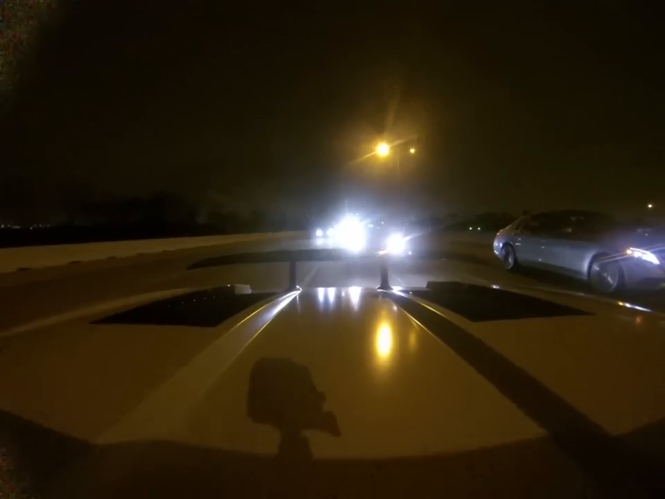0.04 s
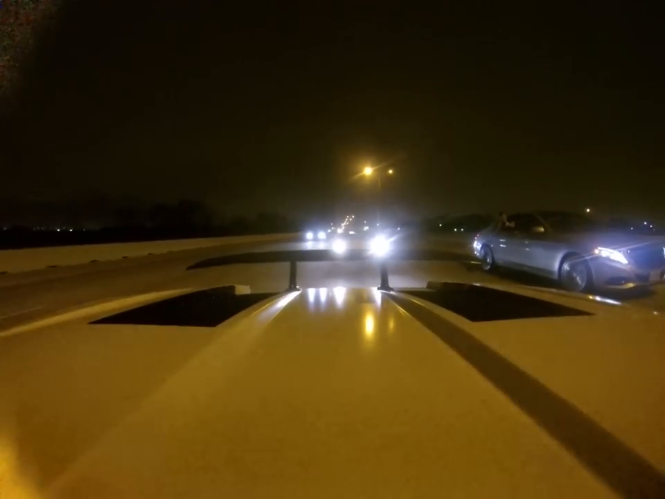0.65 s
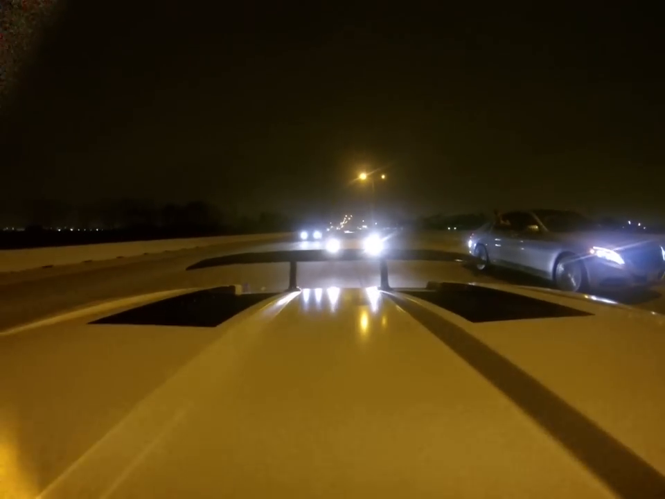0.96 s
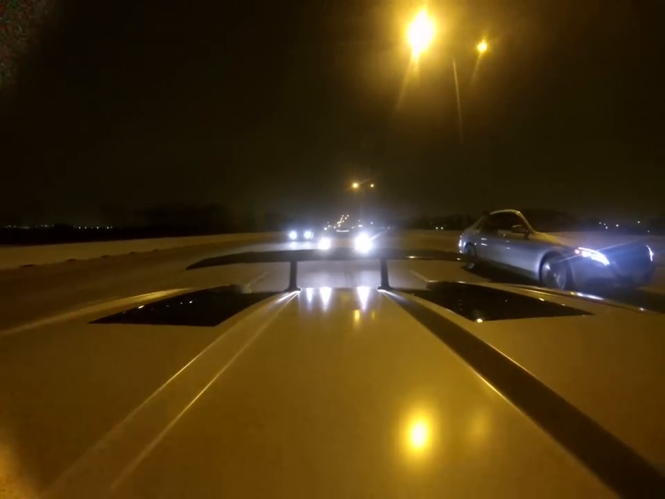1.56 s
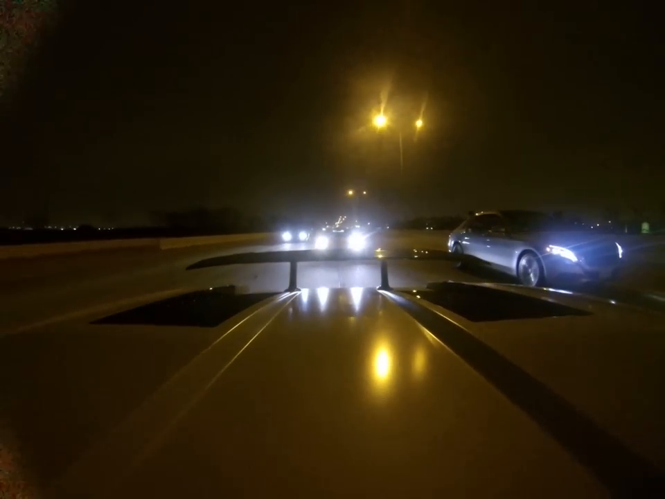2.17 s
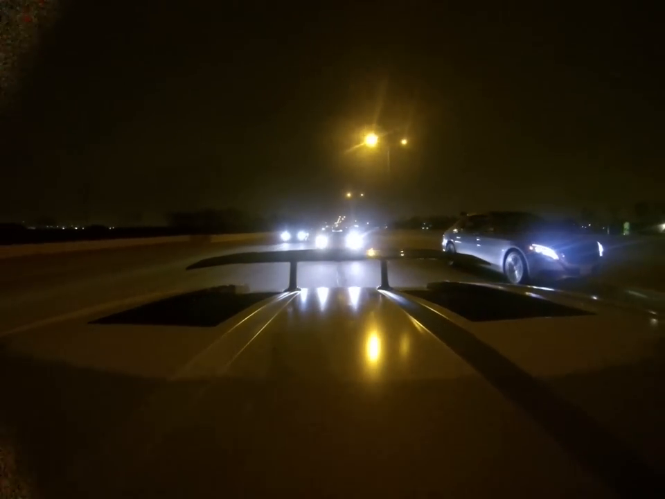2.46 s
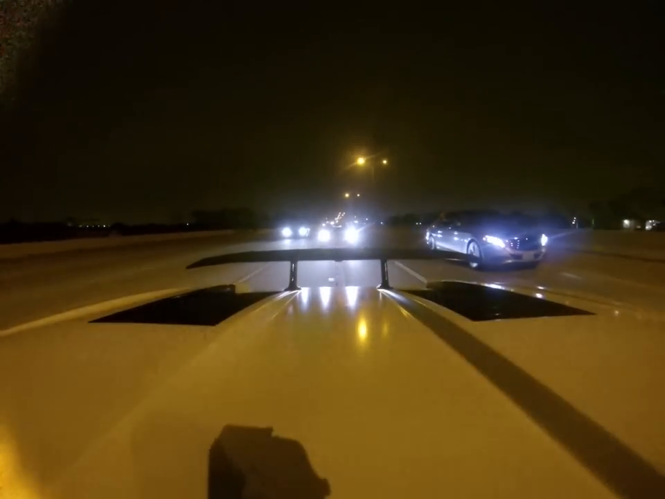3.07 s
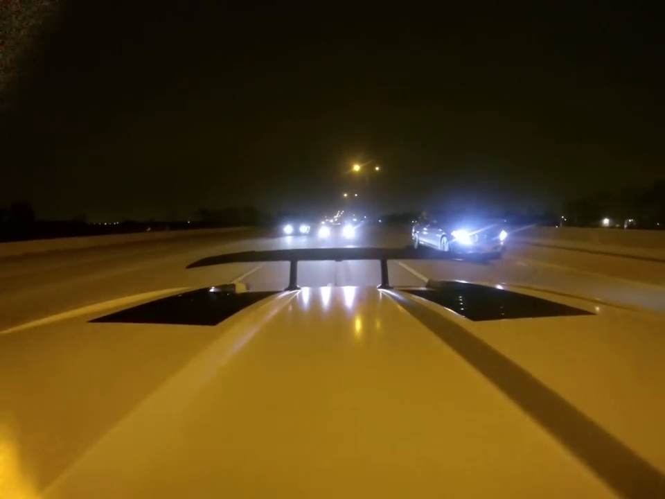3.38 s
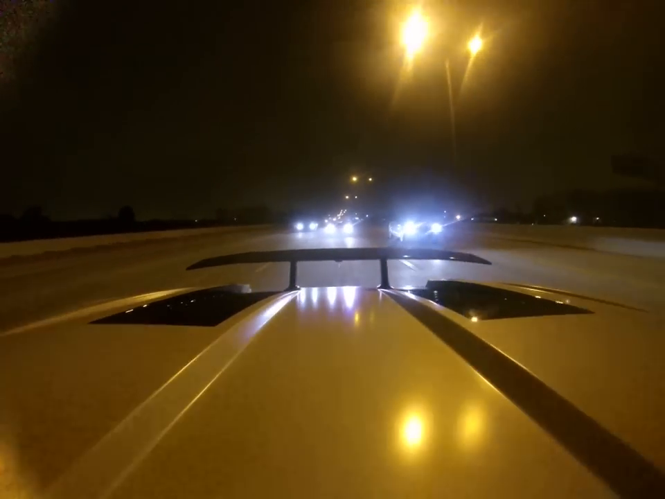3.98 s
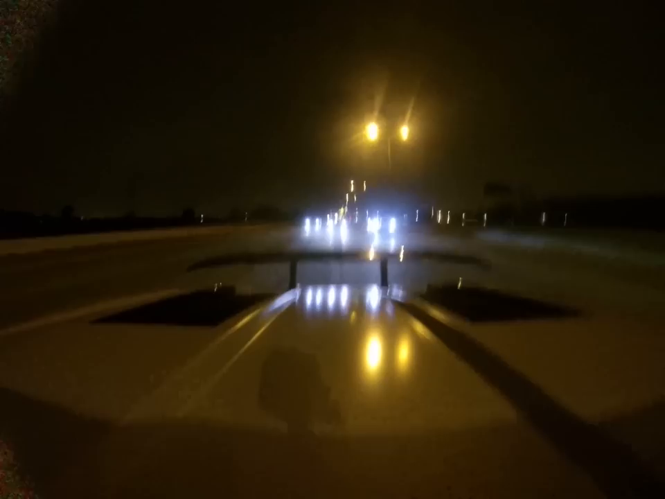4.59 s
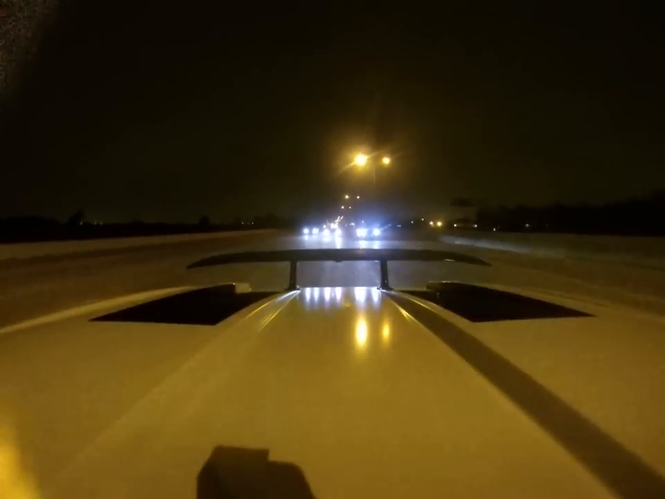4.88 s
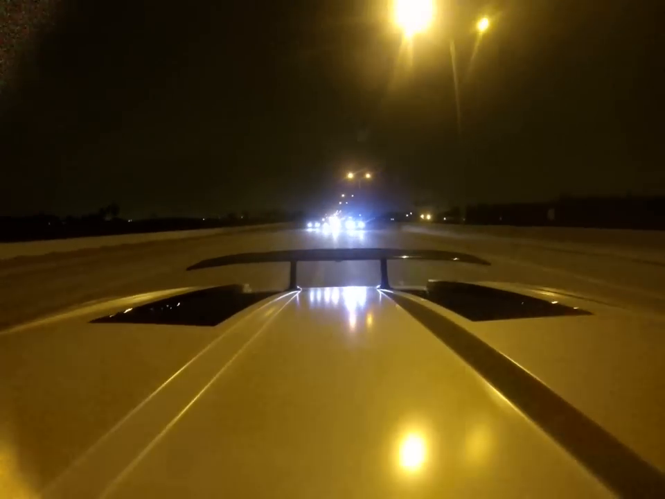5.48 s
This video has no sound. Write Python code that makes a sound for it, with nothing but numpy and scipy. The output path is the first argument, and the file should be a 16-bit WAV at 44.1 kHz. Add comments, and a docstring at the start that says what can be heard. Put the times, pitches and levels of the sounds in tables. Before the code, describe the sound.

A sports car accelerates hard, its exhaust drone and faint turbo whistle rising under heavy wind buffeting, with one upshift.

```python
"""Highway, rear deck of a turbocharged ten-cylinder sports car: cruise, full throttle, one upshift.
The exhaust drones at the firing rate through the pipe's resonances. The turbo whistles at its rising
blade rate; the intake hisses and rasps with boost. Heavy wind buffets and slaps the microphone and,
as it grows, drives it into saturation, so the roar turns harsh and chops the treble."""
import sys
import numpy as np
from scipy.fft import rfft, irfft, next_fast_len
from scipy.io import wavfile
from scipy.ndimage import uniform_filter1d, map_coordinates

SR = 44100
rng = np.random.default_rng(int(sys.argv[2]) if len(sys.argv) > 2 else 0)


def wav_out(sig):
    """Save sig, one row per channel (or a flat mono array), as 16-bit PCM at SR to the path in sys.argv[1]."""
    wavfile.write(sys.argv[1], SR, np.round(np.clip(np.atleast_2d(sig).T, -1, 1) * 32767).astype(np.int16))


N = 244314

# crank speed through cruise, full throttle, upshift, next gear: t/s, f/Hz
CRANK_SPEED = [(0, 81.1), (.2, 80.9), (.6, 79.2), (1.2, 80.9), (1.5, 82.3), (2, 83.8), (2.5, 86.4),
               (2.85, 91.8), (3.1, 97.6), (3.3, 102.8), (3.7, 114.2), (4.47, 130), (4.7, 99), (4.9, 101),
               (5.1, 104.3), (5.54, 109.8)]
# turbo blade rate; spools up, levels off, sags in the shift, recovers: t/s, f/Hz
BLADE_RATE = [(0, 3300), (1.4, 4000), (1.67, 4880), (1.83, 5450), (2.13, 6400), (2.5, 7560), (2.9, 9170),
              (3.1, 10230), (3.3, 11170), (3.55, 11780), (4, 12550), (4.48, 12600), (4.58, 10950),
              (4.72, 10100), (5.1, 11350), (5.54, 12200)]
# finest turbulence: f/Hz, level/dB
FIZZ_SPECTRUM = [(2000, -46), (3500, -13.5), (5200, -1), (7200, -2.5), (8100, -0.5), (8750, 3.5),
                 (9500, -2), (11000, -0.5), (12300, -11), (15000, -13)]


def amp(db):
    """Decibels to gain."""
    return 10 ** (np.asarray(db) / 20)


def unit(x):
    """x scaled to rms 1."""
    return x / np.sqrt(np.mean(x ** 2) + 1e-20)


def lookup(rows, at):
    """Later columns interpolated at values of the first."""
    key, *cols = np.transpose(rows)
    return [np.interp(at, key, c) for c in cols]


def curve(rows):
    """(t/s, value) rows, interpolated per sample."""
    return lookup(rows, np.arange(N) / SR)[0]


def swells(rows):
    """Sum of bell curves: t/s, half length/s, height."""
    t = np.arange(N) / SR
    return sum(height * np.exp(-((t - at_s) / half_s) ** 2) for at_s, half_s, height in rows)


def wobble(rate_hz):
    """Smooth random curve, rate_hz knots a second."""
    knots = rng.standard_normal(int(N * rate_hz / SR) + 4)
    return map_coordinates(knots, [np.arange(N) * rate_hz / SR])


def filtered(x, response):
    """x through a complex frequency response."""
    size = next_fast_len(N + SR // 2)
    return irfft(rfft(x, size) * response(np.fft.rfftfreq(size, 1 / SR)), size)[:N]


def lowpass(x, edge_hz, order=4):
    """Zero-phase low-pass, half gain at edge_hz."""
    return filtered(x, lambda hz: 1 / (1 + (hz / edge_hz) ** order))


def noise(spectrum, pace=1):
    """Noise of rms 1 from (f/Hz, level/dB) rows; pace scales the frequencies."""
    f_hz, db = np.transpose(spectrum)
    x = filtered(rng.standard_normal(N), lambda hz: amp(np.interp(np.log(hz + 1), np.log(f_hz), db)))
    return unit(map_coordinates(x, [np.cumsum(pace * np.ones(N))], mode="mirror"))


def phase(hz):
    """Running angle in rad."""
    return 2 * np.pi * np.cumsum(hz) / SR


def band(centre_hz, width_hz):
    """Narrow noise of rms 1 around a moving centre."""
    a, b = (lowpass(row, width_hz, order=2) for row in rng.standard_normal((2, N)))
    angle = phase(centre_hz)
    return unit(a * np.cos(angle) + b * np.sin(angle))


def boost(full_hz):
    """0 at the starting blade rate, 1 from full_hz up."""
    blade_hz = curve(BLADE_RATE)
    return np.clip((blade_hz - blade_hz[0]) / (full_hz - blade_hz[0]), 0, 1)


def upshift_db(next_gear_db, lag_s=0, at_s=4.675, half_s=.08, dip_db=-20.5):
    """Throttle lift: a dip, later and longer by lag_s, then the next gear's level."""
    shifted = np.clip((np.arange(N) / SR - at_s) / half_s + 1, 0, 1)
    return swells([(at_s + lag_s, half_s + lag_s, dip_db)]) + next_gear_db * shifted


def road_speed():
    """Speed relative to cruise: grows with the revs, holds when they drop."""
    log_rise = np.gradient(np.log(curve(CRANK_SPEED)))
    return np.exp(np.cumsum(np.maximum(log_rise, 0)))


def exhaust(rough_hz=130, rough_rad=.09, muffled_db=-19.5, boom_hz=351, boom_width_hz=22):
    """The engine fires five times a turn, unevenly; the crank's orders sweep the pipe's resonances."""
    # pipe response at the firing rate: f/Hz, level/dB
    pipe_response = [(395, -18.7), (405, -19.3), (413, -15), (419, -19), (425, -16), (440, -18), (457, -18),
                     (485, -14.5), (518, -11), (546, -14), (558, -21), (572, -21.5), (585, -27), (605, -38)]
    # level of the firing note's octave in the upper resonances: f/Hz, level/dB
    upper_response = [(790, -47), (805, -42), (820, -36), (830, -34), (842, -39), (870, -37.5), (910, -34),
                      (960, -31), (1005, -25.5), (1050, -26), (1095, -26.5), (1120, -38), (1170, -50)]
    # crank multiple, cruise level/dB, full-load level/dB, flutter/dB
    orders = [(5, -0.7, -1, 1.5), (6.5, -19.5, -34, 5), (10.5, -36, -23.5, 3), (15, -39, -25.5, 5)]
    crank_hz = curve(CRANK_SPEED)
    crank_rad = phase(crank_hz * (1 + .0015 * wobble(30)))
    pipe_db, = lookup(pipe_response, 5 * crank_hz)
    load = boost(full_hz=11800)
    note = np.zeros(N)
    for multiple, cruise_db, full_db, flutter_db in orders:
        wave = np.sin(multiple * crank_rad + rng.uniform(0, 2 * np.pi) + rough_rad * wobble(rough_hz))
        # higher orders fade faster than the firing note
        muffle_db = 2 * np.minimum(pipe_db - muffled_db, 0) * (multiple > 5)
        order_db = cruise_db + load * (full_db - cruise_db) + muffle_db
        note += amp(order_db + flutter_db * wobble(40)) * wave
    in_tune = 1 / (1 + ((4 * crank_hz - boom_hz) / boom_width_hz) ** 6)
    boom_db = -42 + 17.5 * in_tune + 2 * wobble(25)
    boom = amp(boom_db) * np.sin(4 * crank_rad)
    octave_db, = lookup(upper_response, 10 * crank_hz)
    octave = amp(octave_db + 2 * wobble(40)) * np.sin(10 * crank_rad + rough_rad * wobble(rough_hz))
    octave *= amp(upshift_db(-1.5, lag_s=.034))
    drone = amp(pipe_db + wobble(rough_hz)) * note + boom
    drone *= amp(upshift_db(-3.5))
    return np.sqrt(2) * (drone + octave)


def turbo(waver=.0025, flicker_db=3, respool_db=-4, slowing_db=-12):
    """The compressor whistles at its blade rate in a breath of turbulence; slowing dims the whistle."""
    # level by blade rate: f/Hz, whistle/dB, breath/dB
    spool_levels = [(3300, -87, -85), (5000, -72, -69), (7400, -69, -67), (8800, -63, -60),
                    (9550, -64, -59.5), (10100, -62, -59), (11000, -59.5, -57.5), (12100, -60.5, -57.5),
                    (12450, -71, -62.5)]
    # brief whistles and rushes: t/s, half length/s, ratio to blade rate, width/Hz, level/dB
    flare_events = [(1.68, .03, 1, 22, -59), (1.795, .05, 1, 20, -57), (1.97, .03, 1, 25, -62),
                    (2.1, .12, .89, 90, -63), (2.15, .06, 1.008, 55, -61.5), (2.4, .07, .9, 50, -64),
                    (2.72, .16, 1, 28, -57), (2.82, .12, .985, 380, -61), (3, .09, .88, 420, -57.5),
                    (3.19, .14, 1, 50, -57), (3.66, .15, 1, 60, -59), (4.56, .07, 1, 650, -62),
                    (4.84, .1, .99, 650, -62.5)]
    blade_hz = curve(BLADE_RATE)
    whistle_db, breath_db = lookup(spool_levels, blade_hz)
    pitch_hz = blade_hz * (1 + waver * wobble(40))
    slowing = uniform_filter1d((np.gradient(blade_hz) < 0) * 1., size=SR // 30)
    whistle_db += slowing_db * slowing + upshift_db(respool_db) + flicker_db * wobble(16)
    whistle = amp(whistle_db) * band(pitch_hz, width_hz=80)
    breath_db += .45 * upshift_db(respool_db, lag_s=.03)
    breath = amp(breath_db) * band(.98 * blade_hz, width_hz=560)
    flares = sum(swells([(at_s, half_s, amp(db))]) * band(ratio * pitch_hz, width_hz)
                 for at_s, half_s, ratio, width_hz, db in flare_events)
    return whistle + breath + flares


def intake(throb=.17):
    """Air hisses in and rasps in the duct in time with the cylinders; both grow with boost."""
    # f/Hz, level/dB
    hiss_spectrum = [(3000, -29), (4400, 7), (5400, 8.5), (6800, -4.5), (8000, -2.5), (8800, 1), (9600, -5),
                     (11500, -12.5), (12800, -10.5), (15000, -23.5)]
    rasp_spectrum = [(1000, -69), (1600, -22.5), (2050, -8.5), (2200, -1), (2400, 0), (2600, -9),
                     (3300, -29), (6000, -88.5)]
    # the throttle opens: t/s, half length/s, gain/dB
    rasp_surges = [(2.383, .011, 12), (2.48, .08, 3.5), (2.865, .025, 5)]
    hiss_db = np.interp(boost(full_hz=9000), (0, 1), (-64, -52))
    rasp_db = np.interp(boost(full_hz=11700), (0, 1), (-51, -36))
    rasp_db += upshift_db(-10) + swells(rasp_surges)
    gulps = 1 + throb * np.sin(5 * phase(curve(CRANK_SPEED)))
    return amp(hiss_db) * noise(hiss_spectrum) + amp(rasp_db) * unit(gulps * noise(rasp_spectrum))


def wind(buffet_db=-12.5, roar_db=-13, cruise_pace=.87, smooth_flow_speed=1.593):
    """Big eddies buffet the microphone; smaller ones roar and tear past in fizzing bursts."""
    # rush over the deck: t/s, level/dB
    rush_levels = [(0, -32.5), (.8, -34), (1.6, -30.2), (2.7, -28), (3.4, -23), (3.9, -22), (4.4, -19.5),
                   (5.54, -16)]
    # gusts and lulls: t/s, half length/s, gain/dB
    gusts = [(.075, .018, 8.5), (.165, .006, 4), (.225, .02, 4), (.307, .011, 7.5), (.355, .02, 3.5),
             (.398, .016, 8.5), (.447, .02, 9.5), (.473, .007, 9), (.5, .015, -2), (.626, .011, 6.5),
             (.682, .014, 11), (.724, .006, 5), (.823, .011, 5), (.873, .01, 5.5), (.927, .013, 10),
             (.987, .008, 5.5), (1.07, .025, 6), (1.113, .014, 7), (1.195, .008, 4), (1.288, .02, 9),
             (1.36, .02, 3), (1.45, .025, 5), (1.57, .025, -1.5), (1.685, .013, 7.5), (1.755, .009, 2.5),
             (1.787, .007, 5.5), (1.825, .018, 3.5), (1.878, .008, 3), (1.948, .008, 5), (2.105, .013, 4.5),
             (2.136, .008, 6.5), (2.237, .005, 4), (2.263, .009, 6), (2.324, .013, 5.5), (2.379, .014, 5),
             (2.54, .028, 4.5), (2.6, .02, -2), (2.665, .011, 5.5), (3.607, .009, 5), (3.673, .009, 4.5),
             (3.755, .027, 4.3), (4.037, .009, 4), (4.143, .007, 5), (4.175, .012, 6.5), (4.213, .012, 8.5),
             (4.35, .01, 4), (4.43, .008, 3.5), (4.5, .015, 6), (4.545, .014, 2), (4.634, .011, 4.5),
             (4.69, .012, -7), (4.725, .008, 2.5), (4.83, .02, 2), (4.905, .009, 3), (4.957, .012, 6),
             (5.048, .016, 4.5), (5.15, .025, 2), (5.2, .009, 2.5), (5.235, .016, -2), (5.325, .02, 2),
             (5.372, .012, 2), (5.455, .016, 5)]
    # large to small eddies: f/Hz, level/dB
    buffet_spectrum = [(10, -20), (22, -5.5), (42, -4), (68, -4), (95, -5), (130, -18), (220, -24.5),
                       (500, -100)]
    roar_spectrum = [(40, -38.5), (80, 1), (108, 0.5), (180, -3), (250, -6), (380, -11.5), (550, -18),
                     (900, -30), (2000, -64.5), (5000, -120)]
    rush_spectrum = [(120, -24.5), (280, 4.5), (500, 8), (750, 6), (1000, 6), (1350, -0.5), (2000, -1),
                     (2350, -5), (2650, -11), (3100, -10.5), (4300, -20), (5300, -30), (6800, -38.5),
                     (12000, -67.5)]
    wind_db = curve(rush_levels)
    growth_db = wind_db - wind_db.mean()
    gust_db = swells(gusts) + .5 * wobble(22.13)
    eddy_db = .47 * wobble(70) + 2 * wobble(330)
    # faster air sheds eddies faster: the rumble climbs, its slowest part thins out
    speed = road_speed()
    smooth_flow = (1 + np.tanh((speed - smooth_flow_speed) / .041)) / 2
    rumble = noise(buffet_spectrum, cruise_pace * speed ** .7)
    rumble -= .8 * smooth_flow * lowpass(rumble, edge_hz=60)
    buffet = amp(buffet_db + .37 * growth_db) * rumble
    roar = unit(amp(.5 * eddy_db) * noise(roar_spectrum, cruise_pace * speed ** 1.15))
    roar *= amp(roar_db + .45 * growth_db + .57 * gust_db)
    rush = unit(amp(eddy_db) * noise(rush_spectrum))
    # the finest turbulence crackles inside the strongest eddies
    crackle_db = eddy_db + 3 * wobble(1500)
    fizz = amp(-34) * unit(amp(crackle_db) * noise(FIZZ_SPECTRUM))
    body = lowpass(rush, edge_hz=2600)
    treble = rush - body + fizz
    return buffet + roar + amp(wind_db) * (amp(gust_db) * body + amp(.7 * gust_db) * treble)


def slaps(snap_half_s=.0021, suction_half_s=.0015, suction_peak=2.1):
    """Single eddies hit the microphone port: a brief suction and a snap."""
    # t/s, snap level/dB
    hits = [(.105, -41), (.321, -46), (.453, -42), (.473, -44), (.68, -46), (1.876, -50), (3.133, -47),
            (4.22, -41), (4.945, -42), (5.444, -37)]
    snap = swells([(at_s, snap_half_s, amp(db)) for at_s, db in hits])
    suction = swells([(at_s, suction_half_s, suction_peak) for at_s, _ in hits])
    return snap * noise(FIZZ_SPECTRUM) - suction


def scene():
    """Car and wind at one microphone."""
    return (exhaust() + turbo() + intake() + wind() + slaps())[None]


def record(dry, ceiling=.53, knee=1.78, start_s=.036, bass_hz=20, treble_hz=14200, limit_hz=15150):
    """The microphone saturates softly and sheds its lowest bass and top treble."""
    def response(hz):
        bass_cut = 1j * hz / (bass_hz + 1j * hz)
        return bass_cut / np.sqrt(1 + (hz / treble_hz) ** 20) * (hz < limit_hz)

    x = dry[0]
    squashed = x / (1 + np.abs(x / ceiling) ** knee) ** (1 / knee) + .0072 * x
    # strong suction swings the diaphragm further than pressure does
    squashed += .028 * np.minimum(x + ceiling, 0)
    fade_in = np.clip((np.arange(N) / SR - start_s) / .002, 0, 1)
    return filtered(squashed * fade_in, response)[None]


dry = scene()
out = record(dry)
wav_out(out)
```